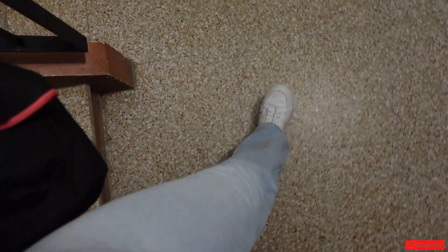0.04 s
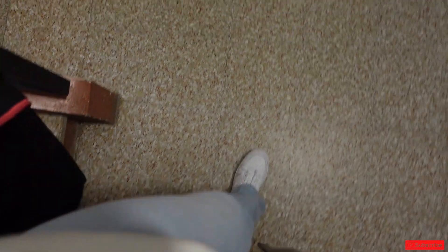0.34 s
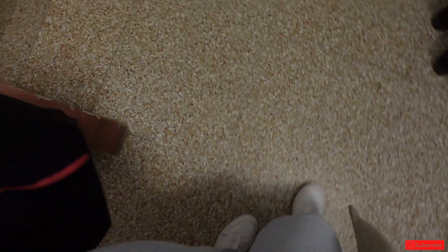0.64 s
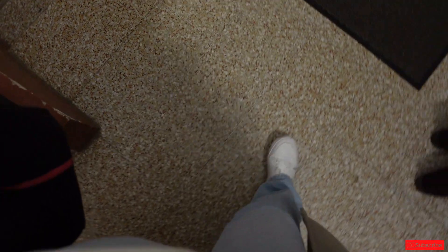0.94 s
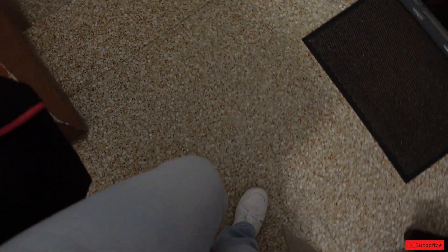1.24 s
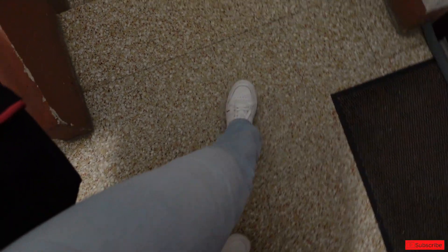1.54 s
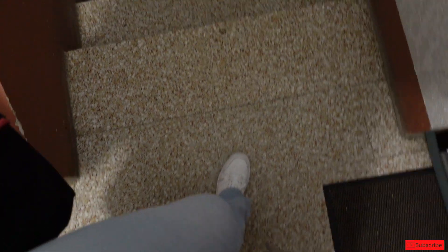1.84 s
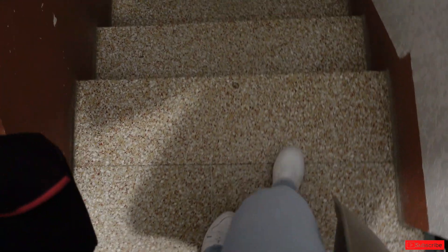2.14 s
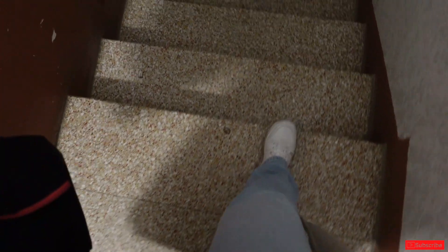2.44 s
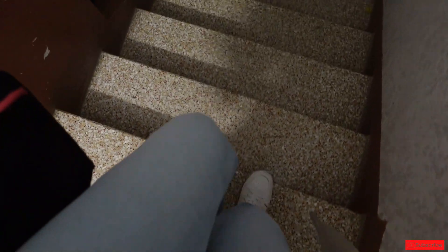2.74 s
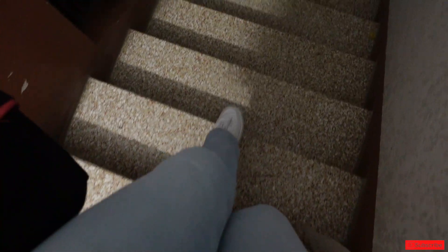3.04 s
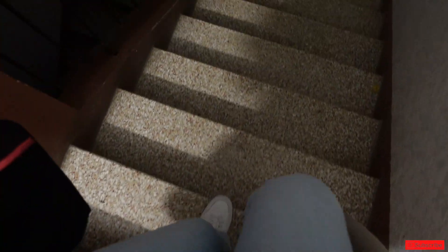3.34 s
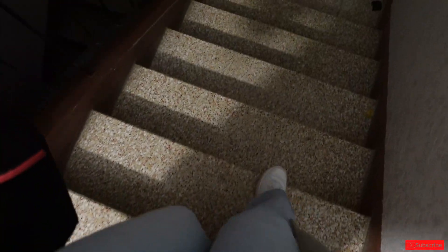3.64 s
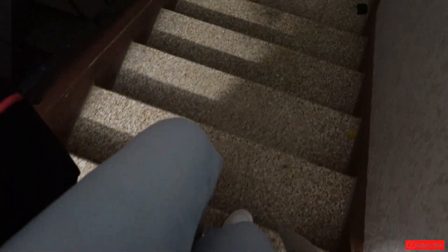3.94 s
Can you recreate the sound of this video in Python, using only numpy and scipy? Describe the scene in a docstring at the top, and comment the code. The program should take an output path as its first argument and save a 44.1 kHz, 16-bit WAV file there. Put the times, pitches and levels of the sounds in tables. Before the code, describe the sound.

Clothes swish with each stride, over faint footsteps on a hard floor and stairs.

```python
"""Clothes swish and soft heels knock: someone in trainers crosses a hard landing and starts downstairs.
Trouser legs and a bag rub close by with each stride; their fibres slip and snag in a dull swish and a
bright hiss. Each footfall strikes the floor and sets the stairwell echoing and booming in its low modes.
A small hard part ticks briefly near the one-second mark."""
import sys
import numpy as np
from scipy import signal
from scipy.fft import rfft, irfft
from scipy.io import wavfile

SR = 44100
rng = np.random.default_rng(int(sys.argv[2]) if len(sys.argv) > 2 else 0)


def master_out(mix):
    """Clip the mix to full scale and print it as 16-bit PCM to the path in sys.argv[1]."""
    frames = np.transpose(np.atleast_2d(mix))
    ceiling = np.clip(frames, -1, 1)
    pcm = np.round(ceiling * 32767).astype(np.int16)
    wavfile.write(sys.argv[1], SR, pcm)


N = 176400
T = np.arange(N) / SR

# Cloth rubs. Each row: time of fastest slide, rise and fall in seconds, swish, hiss and body levels
# in dB, swish centre in Hz.
CLOTH_RUBS = [(0.228, 0.11, 0.066, -47, -46, -55.5, 2420), (0.455, 0.12, 0.12, -49.5, -50.5, -59, 2050),
              (0.498, 0.042, 0.046, -44, -53.5, -58, 2110), (0.80, 0.096, 0.041, -63, -68, -76, 2300),
              (1.05, 0.23, 0.088, -73, -58, -78, 3000), (1.197, 0.079, 0.089, -50.5, -52.5, -59, 2090),
              (1.32, 0.085, 0.14, -68, -59.5, -64, 2000), (1.665, 0.09, 0.048, -60, -61.5, -64, 2100),
              (1.845, 0.037, 0.034, -64, -61, -61, 2000), (1.975, 0.065, 0.043, -47, -51.5, -59, 2090),
              (2.04, .05, 0.077, -54.5, -54.5, -58, 2190), (2.121, 0.035, .035, -47.5, -55.5, -47.5, 2750),
              (2.56, 0.06, 0.033, -73, -58.5, -67, 2100), (2.62, .018, 0.053, -42.5, -53.5, -54.5, 2120),
              (2.73, 0.14, 0.1, -49.5, -49, -60.5, 1900), (2.795, 0.035, 0.023, -46, -51.5, -55.5, 1750),
              (2.96, 0.063, 0.087, -56, -53.5, -67, 1970), (3.265, 0.12, 0.057, -54.5, -55.5, -56.5, 2300),
              (3.48, 0.046, .07, -61, -59.5, -85, 2400), (3.85, 0.073, .04, -57, -56, -56.5, 2000),
              (3.95, 0.036, 0.038, -52, -51, -52.5, 3800), (3.995, 0.042, 0.046, -51.5, -47, -55.5, 1800)]


def from_db(db):
    return 10 ** (np.asarray(db) / 20)


def unit_rms(x):
    return x / np.sqrt(np.mean(x ** 2) + 1e-20)


def at_hz(points, hz):
    """Interpolate a table over log frequency."""
    points_hz, values = np.transpose(points)
    return np.interp(np.log(hz + 1e-3), np.log(points_hz), values)


def colour(x, spectrum):
    """Filter by rows of frequency in Hz, gain in dB."""
    n = x.shape[-1]
    return irfft(rfft(x) * from_db(at_hz(spectrum, np.fft.rfftfreq(n, 1 / SR))), n)


def low_cut(x, hz):
    return signal.sosfilt(signal.butter(2, hz, "high", fs=SR, output="sos"), x + 1e-18)


def widen(pair):
    """Two independent signals, as mid and side, to narrow stereo."""
    # Each row: frequency in Hz, side gain in dB.
    side_gain = [(60, -5), (150, -16), (280, -12), (500, -9.5), (2000, -11), (5000, -10), (8500, -9),
                 (12000, -25), (16000, -42)]
    side = colour(pair[1], side_gain)
    return np.array([pair[0] + side, pair[0] - side])


def flutter(spread_db, rate_hz):
    """Random gain from unsteady contact pressure."""
    hop, settle = 40, 2000
    pole = np.exp(-2 * np.pi * rate_hz * hop / SR)
    noise = rng.standard_normal(N // hop + settle + 2)
    slow = signal.lfilter([1], [1, -2 * pole, pole * pole], noise)[settle:]
    return from_db(spread_db * np.interp(np.arange(N) / hop, np.arange(len(slow)), unit_rms(slow)))


def fibres(snags_per_s=4500, snag_share=0.35, spread_db=3.0):
    """Fibres slip in a smooth hiss and snag in tiny clicks; two independent white signals."""
    snags = (rng.random((2, N)) < snags_per_s / SR) * rng.choice([-1, 1], (2, N))
    snags = snags * from_db(spread_db * np.minimum(rng.exponential(1, (2, N)), 4))
    slip = rng.standard_normal((2, N))
    return np.sqrt(snag_share) * unit_rms(snags) + np.sqrt(1 - snag_share) * slip


def friction(spectrum, flutter_db, flutter_hz):
    """Coloured fibre noise under fluttering pressure."""
    return widen(unit_rms(colour(fibres(), spectrum))) * flutter(flutter_db, flutter_hz)


def air(level_db=-70.5):
    """Still stairwell air: faint steady noise."""
    # Each row: frequency in Hz, gain in dB.
    spectrum = [(20, -59), (60, -23), (125, -13), (250, -1), (500, 0), (1500, 5.5), (6000, 0), (16000, -28)]
    return from_db(level_db) * widen(unit_rms(colour(rng.standard_normal((2, N)), spectrum)))


def rustle():
    """Moving clothes rustle lightly throughout."""
    # Each row: time in seconds, broadband level in dB, treble level in dB.
    levels = [(0, -55, -60.5), (.1, -56, -57.5), (.35, -56, -59.5), (.7, -59, -67), (.95, -58.5, -61.5),
              (1.2, -61.5, -61), (1.38, -58, -64.5), (1.53, -62.5, -64.5), (1.78, -60.5, -67.5),
              (2.1, -53.5, -64), (2.28, -56, -73), (2.46, -60.5, -66.5), (2.7, -54, -69), (3.1, -55, -63.5),
              (3.35, -54.5, -59), (3.66, -57, -61.5), (4, -48.5, -54.5)]
    # Spectra of the two layers. Each row: frequency in Hz, gain in dB.
    broad_spectrum = [(50, -39), (120, -24), (250, -14), (500, -11.5), (1000, -5), (1600, 1.5), (2300, 1.5),
                      (3200, 0), (4500, -1.5), (6500, -10.5), (8000, -15.5), (10000, -18.5), (16000, -24)]
    treble_spectrum = [(500, -45), (2500, -19), (4500, 0), (6500, 0.5), (8000, -1.5), (10000, -5.5),
                       (13000, -11), (16000, -17)]
    times_s, broad_db, treble_db = np.transpose(levels)
    broad = friction(broad_spectrum, flutter_db=1.0, flutter_hz=25)
    treble = friction(treble_spectrum, flutter_db=0.1, flutter_hz=25)
    return (from_db(np.interp(T, times_s, broad_db)) * broad
            + from_db(np.interp(T, times_s, treble_db)) * treble)


def slide(peak_s, rise_s, fall_s, shape=1.42):
    """Speed of one cloth slide, peak 1; shape 1 is pointed, 2 a bell."""
    distance = np.abs((T - peak_s) / np.where(T < peak_s, rise_s, fall_s))
    return np.exp(-np.minimum(distance ** shape, 30))


def swishes():
    """Each rub swishes at its own pitch, on its own stretch of fibre noise."""
    # Each row: multiple of the centre frequency, gain in dB.
    spectrum = [(.05, -48), (.22, -37), (.39, -8.5), (.55, -10), (.8, 0.5), (1, 1), (1.35, 0), (1.95, -10),
                (3, -20), (5, -31), (8, -37)]
    noise, out = fibres(), 0
    for k, (peak_s, rise_s, fall_s, db, _, _, centre_hz) in enumerate(CLOTH_RUBS):
        stretch = np.roll(noise, k * N // len(CLOTH_RUBS), axis=1)
        swish = colour(stretch, [(centre_hz * ratio, gain_db) for ratio, gain_db in spectrum])
        out = out + from_db(db) * slide(peak_s, rise_s, fall_s) * unit_rms(swish)
    return widen(out) * flutter(spread_db=0.5, rate_hz=45)


def rubs():
    """Cloth slides on cloth: swish, bright fibre hiss and dull fabric body follow the speed."""
    # Each row: frequency in Hz, gain in dB.
    hiss_spectrum = [(100, -44), (400, -33), (1000, -3), (2000, -14.5), (3000, -0.5), (4200, 3.5),
                     (6000, 1.5), (8000, -3.5), (10000, -12), (13000, -13.5), (16000, -31)]
    body_spectrum = [(60, -44), (150, -23), (300, -7.5), (480, -12.5), (780, -2.5), (1050, 1), (1450, 0.5),
                     (2200, -2), (4000, -5), (12000, -62)]
    rows = np.array(CLOTH_RUBS)
    speeds = np.array([slide(*timing_s) for timing_s in rows[:, :3]])
    hiss_gain, body_gain = np.sqrt(from_db(rows[:, 4:6]).T ** 2 @ speeds ** 2)  # overlaps add in power
    return (swishes()
            + hiss_gain * friction(hiss_spectrum, flutter_db=2.0, flutter_hz=40)
            + body_gain * friction(body_spectrum, flutter_db=2.0, flutter_hz=50))


def soft_blow(start_s, hz, q, contact_s=0.00017):
    """Rubber contact pulse, twice through a broad resonance; peak 1."""
    age = np.maximum(T - start_s, 0) / contact_s
    pulse = age * np.exp(-np.minimum(age, 60)) + 1e-18
    b, a = signal.iirpeak(hz, q, fs=SR)
    blow = signal.lfilter(b, a, signal.lfilter(b, a, pulse))
    return blow / np.abs(blow).max()


def ring(start_s, hz, t60_s):
    """One struck mode: a decaying sine."""
    age_s = np.maximum(T - start_s, 0)
    return np.sin(2 * np.pi * hz * age_s) * from_db(-60 * age_s / t60_s)


def footsteps(stairs_from_s=2.8, boom_rise_s=0.012):
    """Heel and sole knock and thud on the floor; the stairwell answers with echo and low modes."""
    # Each row: start in seconds, knock in dB and Hz, thud in dB and Hz, echo send in dB, boom in dB.
    footfalls = [(0.159, -53.5, 510, -66, 250, -3, -79), (0.262, -41, 920, -70, 247, -3.5, -90),
                 (0.659, -65, 595, -63.5, 223, -5, -82), (0.895, -55.5, 616, -54.5, 326, 3, -90),
                 (0.939, -68, 900, -68, 220, 1, -60.5), (1.648, -70, 606, -61.5, 254, 0.5, -92),
                 (1.963, -44, 810, -67, 300, -0.5, -90), (2.118, -55.5, 700, -64, 327, 11, -88),
                 (2.394, -51.5, 600, -60, 370, 0.5, -81), (3.169, -32, 1040, -42.5, 240, 0.5, -57),
                 (3.201, -47, 530, -44, 330, -0.5, -60.5), (3.24, -51, 487, -54.5, 400, 9, -66),
                 (3.732, -39, 1140, -50, 222, 5, -63), (3.889, -47, 700, -58, 250, -8, -71),
                 (3.975, -62, 700, -53.5, 281, 2, -76)]
    # Room modes heard at each place. Each row: frequency in Hz, gain in dB, T60 in seconds.
    landing_modes = [(145, -16, 1.0), (199.6, 0, 0.4), (248, -10, 0.9), (312, -11, 0.38)]
    stair_modes = [(114.4, -14.5, 0.7), (184.2, 0.5, 0.67), (272, -2.5, 0.74), (391.5, -3, .8),
                   (414, -2, .6), (453, -2, .7), (531.5, 1.5, .45)]
    direct, send, boom = 0, 0, 0
    for start_s, knock_db, knock_hz, thud_db, thud_hz, echo_db, boom_db in footfalls:
        knock = from_db(knock_db) * soft_blow(start_s, knock_hz, q=1.36)
        thud = from_db(thud_db) * soft_blow(start_s, thud_hz, q=1.31)
        direct = direct + knock + thud
        send = send + from_db(echo_db) * (knock + thud)
        swell = 1 - np.exp(-np.maximum(T - start_s, 0) / boom_rise_s)
        for hz, db, t60_s in landing_modes if start_s < stairs_from_s else stair_modes:
            boom = boom + swell * from_db(boom_db + db) * ring(start_s + rng.random() / hz, hz, t60_s)
    return boom + low_cut(direct, hz=146) + stairwell(low_cut(send, hz=77))


def stairwell(x, build_s=0.0095, length_s=1.4):
    """Diffuse echo: builds up, then dies band by band, the mids last."""
    # Each row: frequency in Hz, T60 in seconds.
    decay_times = [(100, 0.83), (300, 1.04), (1000, 1.1), (2500, 0.75), (6000, 0.47), (14000, 0.75)]
    t = T[:int(length_s * SR)]
    hz, edges_hz = np.fft.rfftfreq(len(t), 1 / SR), np.geomspace(40, 20000, 13)
    noise, tail = rfft(rng.standard_normal((2, len(t)))), 0
    for low, high in zip(edges_hz, edges_hz[1:]):
        band = irfft(noise * ((hz >= low) & (hz < high)), len(t))
        tail = tail + band * from_db(-60 * t / at_hz(decay_times, np.sqrt(low * high)))
    build = 1 - np.exp(-t / build_s)
    norm = np.sqrt(np.sum((build * from_db(-60 * t)) ** 2))
    return signal.fftconvolve(x[None], widen(tail) * build / norm, axes=1)[:, :N]


def scuffs():
    """Smooth fabric slides in short, bright scuffs."""
    # Each row: peak time, rise and fall in seconds, level in dB.
    slides = [(0.215, 0.055, 0.047, -55), (0.48, 0.061, 0.071, -56.5), (0.996, .009, 0.0085, -55.5),
              (1.19, 0.024, .03, -58.5), (1.98, 0.066, 0.074, -61), (2.635, 0.06, 0.044, -57),
              (3.372, .008, .011, -58), (3.52, .07, .1, -66), (3.935, 0.048, 0.026, -55)]
    # Each row: frequency in Hz, gain in dB.
    spectrum = [(1000, -40), (6000, -14), (8500, 7), (12000, -1), (16000, -7)]
    gain = sum(from_db(db) * slide(*timing_s) for *timing_s, db in slides)
    return gain * friction(spectrum, flutter_db=0, flutter_hz=50)


def ticks(echo_db=-6):
    """Small hard parts, perhaps of a zip, touch and ring briefly."""
    # Each row: start in seconds, level in dB, frequency in Hz, T60 in seconds.
    contacts = [(0.9135, -40, 3420, .007), (0.9172, -37, 3340, 0.0084), (0.9335, -43, 3300, 0.013)]
    rings = sum(from_db(db) * ring(start_s, hz, t60_s) for start_s, db, hz, t60_s in contacts)
    direct = low_cut(rings, hz=1300)
    return direct + from_db(echo_db) * stairwell(direct)


def scene(cloth_echo_db=-6.5):
    """Clothes, feet, ticks and air; bass and treble lean slightly right."""
    # Each row: frequency in Hz, left minus right in dB.
    balance = [(100, -1.5), (280, -1), (600, -0.5), (1200, 0.7), (2200, 0.5), (4500, -0.8), (8000, -1.3),
               (12000, -2)]
    cloth = rubs() + scuffs() + rustle()
    room = air() + from_db(cloth_echo_db) * stairwell(cloth.mean(axis=0))
    left, right = cloth + room + footsteps() + ticks()
    return np.array([colour(left, [(hz, db / 2) for hz, db in balance]),
                     colour(right, [(hz, -db / 2) for hz, db in balance])])


def record(dry, cutoff_hz=15750):
    """Steep low-pass."""
    return signal.sosfilt(signal.ellip(12, .1, 80, cutoff_hz, fs=SR, output="sos"), dry)


dry = scene()
out = record(dry)
master_out(out)
```